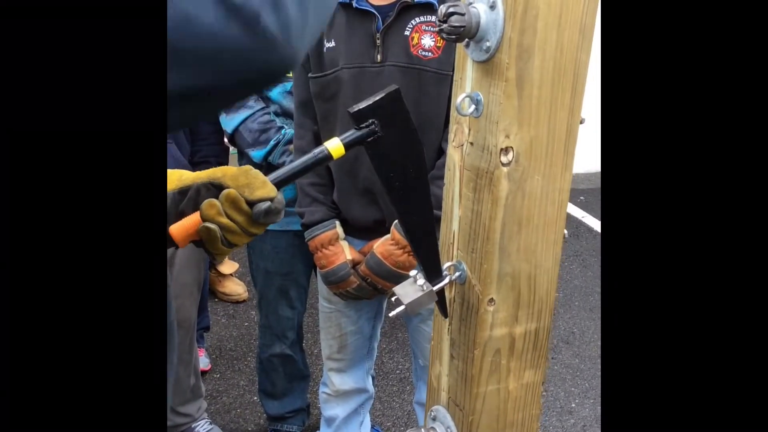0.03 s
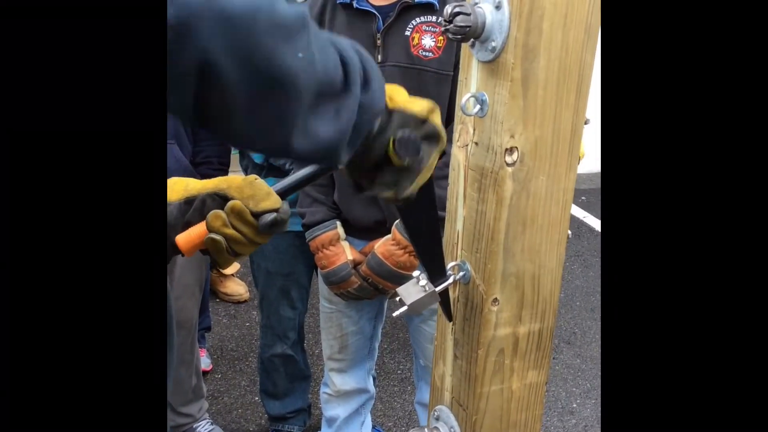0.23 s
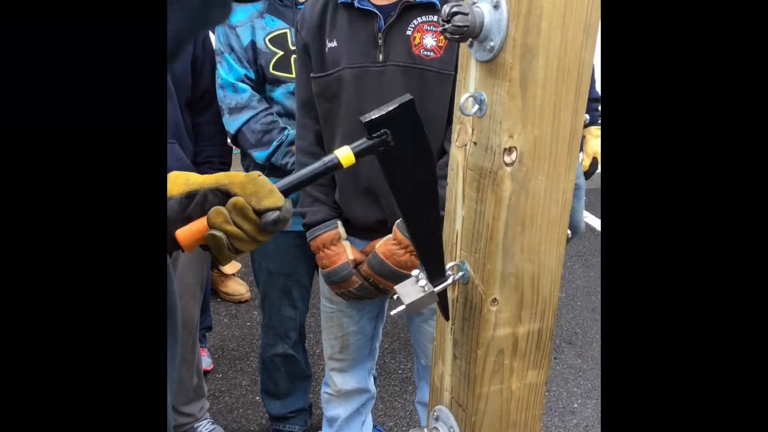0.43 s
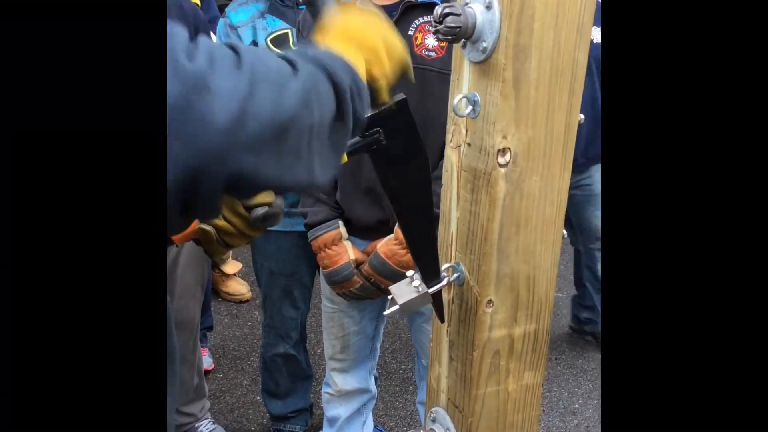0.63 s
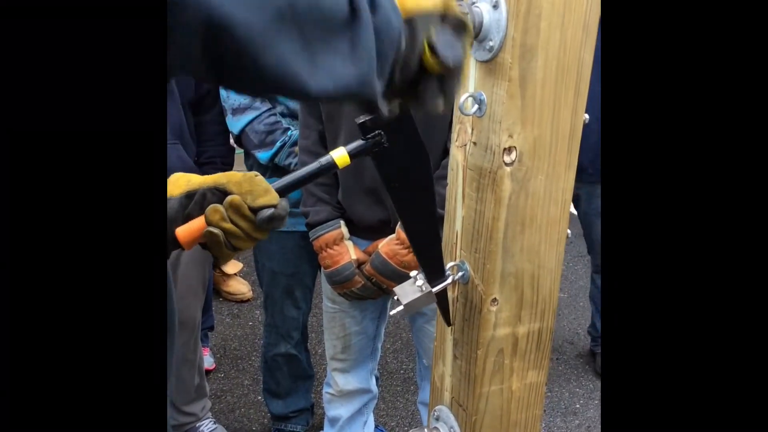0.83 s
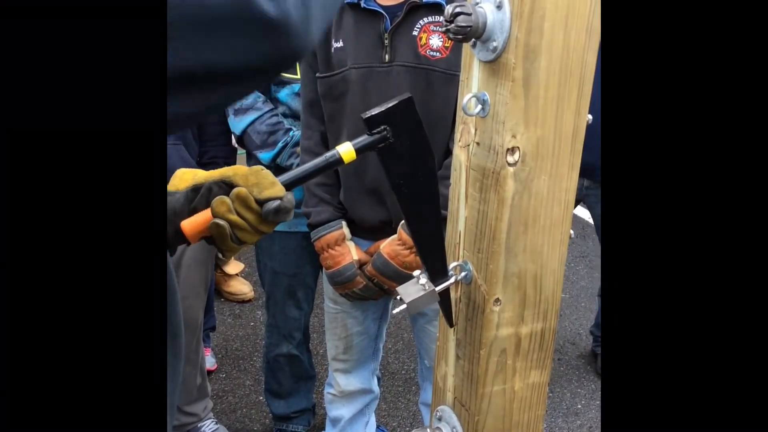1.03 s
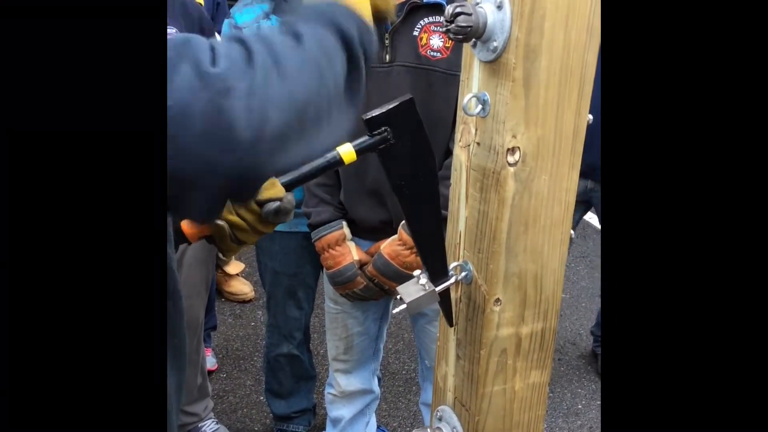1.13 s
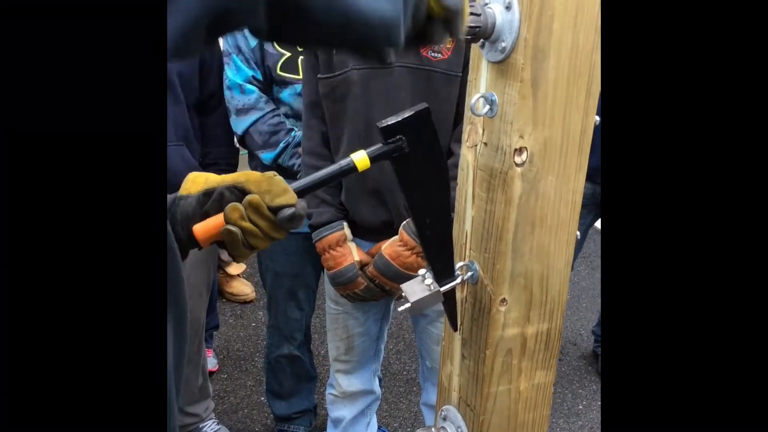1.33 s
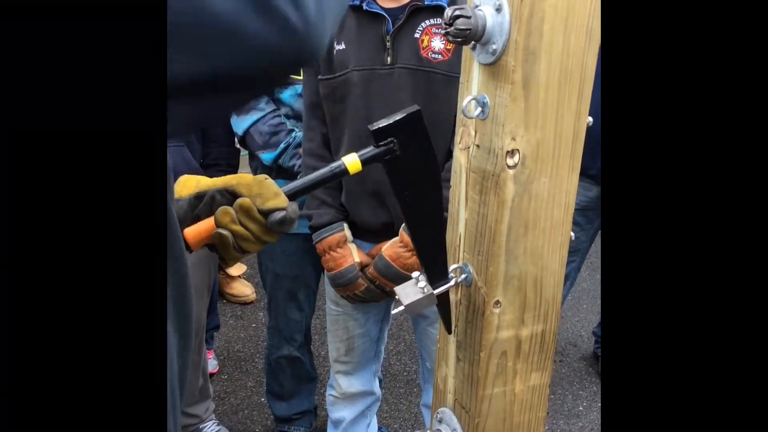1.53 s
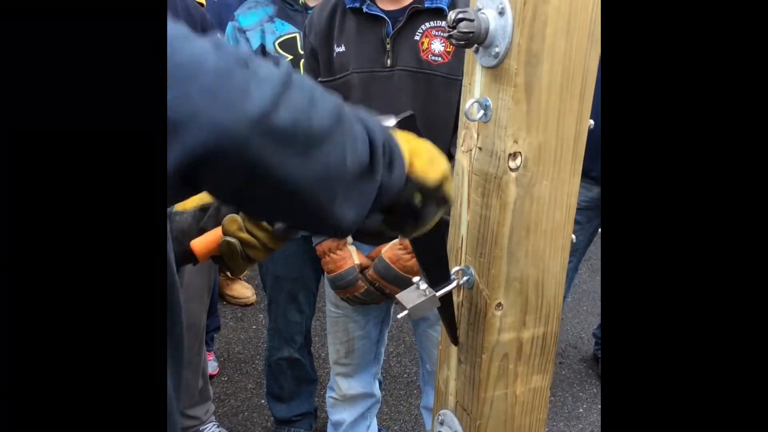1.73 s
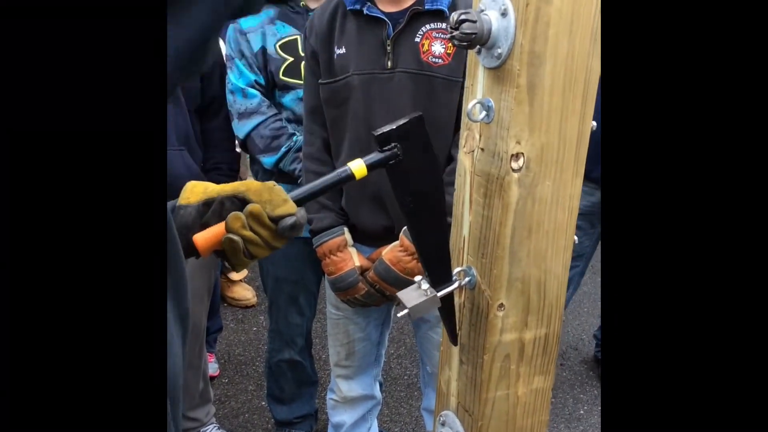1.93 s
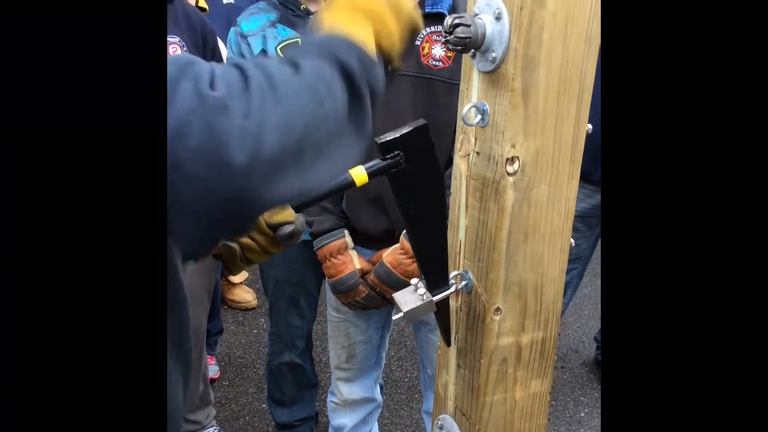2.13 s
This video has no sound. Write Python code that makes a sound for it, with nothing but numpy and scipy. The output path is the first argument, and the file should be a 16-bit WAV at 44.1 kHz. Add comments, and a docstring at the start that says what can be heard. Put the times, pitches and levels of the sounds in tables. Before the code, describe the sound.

A hammer strikes a steel tool four times outdoors, ringing sharply and rattling a padlock.

```python
"""In an outdoor hush, with a soft rustle and the tick of a loose padlock, a hammer swings at a steel
entry tool whose blade is wedged at the lock on a timber post. Four blows land, half a second apart.
A brief swell of hiss and ringing tones is heard just before each. The blow cracks, thumps the post,
rings the steel and shakes the lock; post and fitting knock back, and the yard echoes faintly.
The recorder turns itself down after each blow, then lets the hush return."""
import sys
import numpy as np
from scipy import signal
from scipy.fft import rfft, irfft
from scipy.io import wavfile
from scipy.ndimage import uniform_filter1d, minimum_filter1d

SR = 44100
rng = np.random.default_rng(int(sys.argv[2]) if len(sys.argv) > 2 else 0)


def waveform_to_disk(signal):
    """Save audio, clipped to [-1, 1], as 16-bit WAV at the path in sys.argv[1]."""
    frames = np.transpose(np.atleast_2d(signal))
    scaled = np.clip(frames, -1, 1) * 32767
    samples = np.round(scaled).astype(np.int16)
    wavfile.write(sys.argv[1], SR, samples)


N = 97020

# The hammer blows. Each row: time in seconds, extra dB for the crack, clatter, ring and thump,
# spot struck on the tool from 0 to 1, treble tilt in dB per octave.
BLOWS = [(.2178, 3, 0, 0, 3, 0.16, 0.5), (0.7375, 2, 1.5, 2, 10, 0.38, 1),
         (1.2555, -1.5, 0, -1, 2.5, 0.85, -0.73), (1.7384, 0, 0, 1, 5.5, 1, -0.17)]


def amp(db):
    """Turns decibels into a number to multiply a sound by."""
    return 10 ** (np.asarray(db) / 20)


def evened(x):
    """Scales a sound to an average (rms) level of 1."""
    return x / np.sqrt(np.mean(x ** 2) + 1e-20)


def read(points, hz):
    """Reads between the rows of a table, with frequencies spaced by octaves."""
    row_hz, value = np.transpose(points)
    return np.interp(np.log(hz + 1), np.log(row_hz + 1), value)


def add(mix, start_s, sound):
    """Mixes a sound in at its start time."""
    part = mix[max(round(start_s * SR), 0):][:len(sound)]
    part += sound[:len(part)]


def coloured(x, spectrum, tilt_db=0):
    """Sets how strong a sound's low and high parts are, then evens its level."""
    hz = np.fft.rfftfreq(len(x), 1 / SR)
    gain = amp(read(spectrum, hz) + tilt_db * np.log2(hz + 20))
    return evened(irfft(rfft(x) * gain, len(x)))


def wobble(length, span_s):
    """A random curve that drifts to a new value every span_s seconds."""
    t = np.arange(length) / SR
    return np.interp(t / span_s, np.arange(length), rng.standard_normal(length))


def fade(t, fade_s):
    """Dies away by 60 dB in fade_s seconds, the fade time."""
    return np.exp(-np.log(1000) * t / fade_s)


def dying(x, fade_times):
    """Lets each frequency die away at its own speed."""
    hz, t, bands = signal.stft(x, SR, nperseg=256)
    gain = amp(-60 * t / read(fade_times, hz)[:, None])
    return signal.istft(bands * gain, SR)[1][:len(x)]


def hush():
    """The outdoor background: low, soft noise that swells slightly."""
    # The tone of the hush. Each row: frequency in Hz, relative level in dB.
    spectrum = [(25, -14), (65, 6.5), (130, 5), (250, 3), (420, 5), (800, -0.5), (1400, -3.5), (2800, -8.5),
                (4000, -9), (6500, -19), (10000, -21), (15000, -34)]
    level_db = -57.5 + 1.1 * wobble(N, span_s=0.04)
    return amp(level_db) * coloured(rng.standard_normal(N), spectrum)


def rustles():
    """Soft rustles, probably a sleeve as the arm draws back."""
    # The rustles. Each row: start in seconds, length in seconds, level in dB.
    moves = [(.07, 0.086, -56), (0.523, 0.087, -57.5), (1.012, 0.11, -52), (2.037, 0.09, -55)]
    # Their tone. Each row: frequency in Hz, relative level in dB.
    spectrum = [(25, -6), (70, 8.5), (160, 5), (260, 10.5), (450, 2), (800, 3.5), (1400, 0), (2800, -7),
                (4000, -6), (6500, -12), (10000, -17), (15000, -32)]
    out, t = np.zeros(N), np.arange(SR // 4) / SR
    for start_s, length_s, db in moves:
        arch = np.sqrt(abs(np.sin(np.pi * np.minimum(t / length_s, 1))))
        add(out, start_s, amp(db) * arch * coloured(rng.standard_normal(len(t)), spectrum))
    return out


def ticks():
    """The loose lock shifts and ticks faintly while the hammer is away."""
    # The ticks. Each row: start in seconds, level in dB.
    shifts = [(0.093, -50.5), (1.165, -51), (1.628, -42.5)]
    # Their tone. Each row: frequency in Hz, relative level in dB.
    spectrum = [(200, 2.5), (1300, 6.5), (2500, -2.5), (4000, -3), (8000, -19), (15000, -26.5)]
    out, t = np.zeros(N), np.arange(SR // 4) / SR
    for start_s, db in shifts:
        noise = coloured(rng.standard_normal(len(t)), spectrum)
        add(out, start_s, amp(db) * noise * fade(t, fade_s=0.042))
    return out


def knocks():
    """The shaken post and fitting knock with short, hollow timber tones that have no deep bass."""
    # The knocks. Each row: start in seconds, level in dB, pitch in Hz, fade time in seconds.
    hits = [(.095, -48.5, 443, 0.1), (.296, -16, 488, 0.043), (.3025, -12, 558, 0.046),
            (0.3096, -16, 459, 0.046), (.332, -25, 422.6, 0.087), (.348, -26.5, 479, 0.09),
            (0.797, -19.5, 444, 0.078), (.8185, -12, 428.6, 0.077), (.828, -13.5, 396, 0.1),
            (.870, -27.5, 524, .06), (0.885, -27.5, 419, 0.11), (.903, -32.5, 495, 0.038),
            (.953, -35.5, 361, .1), (1.166, -42, 261.5, 0.054), (1.275, -17.5, 552, 0.036),
            (1.325, -18.5, 411, 0.032), (1.384, -29.5, 560, .09), (1.402, -32.5, 397, 0.071),
            (1.435, -34.5, 402, 0.048), (1.766, -11.5, 477, .06), (1.811, -17.5, 543, 0.044),
            (1.827, -11.5, 417, 0.037), (1.834, -13.5, 563.7, 0.086), (1.869, -15, 407.4, 0.053),
            (1.893, -32.5, 444, 0.15)]
    # The timber's tones. Each row: multiple of the knock's pitch, relative level in dB.
    timber = [(0.378, -19), (.78, -7.5), (0.998, -0.5), (1.301, -8), (1.618, -12), (2.049, -15.5),
              (2.7, -29.5)]
    # The gritty noise in a knock. Each row: frequency in Hz, relative level in dB.
    grit_spectrum = [(30, -41.5), (80, -7), (160, -2), (280, -16.5), (500, -3), (900, -0.5), (1500, -17),
                     (4000, -37.5), (9000, -28.5), (15000, -62.5)]
    rise_s, bass_cut_hz = 0.0016, 137.2
    out, t = np.zeros(N), np.arange(SR // 4) / SR
    for start_s, db, hz, fade_s in hits:
        wood = sum(amp(tone_db) * np.sin(2 * np.pi * (hz * ratio * t + rng.random()))
                   for ratio, tone_db in timber)
        grit = amp(-10.5) * coloured(rng.standard_normal(len(t)), grit_spectrum)
        add(out, start_s, amp(db) * (wood + grit) * fade(t, fade_s) * np.minimum(t / rise_s, 1))
    return signal.sosfilt(signal.butter(4, bass_cut_hz, "high", fs=SR, output="sos"), out)


def yard_echo(x):
    """The surroundings send back a thin, blurred echo."""
    # How the echo dies. Each row: frequency in Hz, fade time in seconds.
    fade_times = [(200, 0.45), (2000, 0.99), (5000, 0.88), (9000, 0.68), (15000, 0.71)]
    tail = dying(rng.standard_normal(SR), fade_times)
    return amp(-27.5) * signal.fftconvolve(x, tail / np.linalg.norm(tail))[:N]


def lead_in_swells():
    """A brief swell of hiss and ringing tones is heard just before each crack."""
    # The tone of the hiss. Each row: frequency in Hz, relative level in dB.
    hiss_spectrum = [(50, 8), (150, -0.5), (500, 2), (1200, -11.5), (2500, -2.5), (4500, -3.5), (6500, -10),
                     (8200, -13), (9500, -25), (15000, -30.5)]
    # The balance of the ringing tones. Each row: frequency in Hz, relative level in dB.
    ring_spectrum = [(2000, -8), (3800, -5), (4600, 2.5), (7000, -11.5), (8100, -0.5), (9000, -24)]
    peak_s, lead_s = 0.016, 0.0235
    out, t = np.zeros(N), np.arange(SR // 20) / SR
    swell = amp(np.interp(t, [0, peak_s, lead_s], [-19, 0, -5])) * (t < lead_s)
    for time_s, *_, spot, tilt_db in BLOWS:
        hiss = amp(-27) * coloured(rng.standard_normal(len(t)), hiss_spectrum, tilt_db)
        ring = amp(-22) * coloured(steel(t, spot, fading=False), ring_spectrum)
        add(out, time_s - lead_s, swell * hiss + swell ** 2.4 * ring)  # the ring swells more steeply
    return out


def steel(t, spot, fading=True):
    """The tool rings with many wavering tones; the spot struck sets how strong each is."""
    # The tool's tones. Each entry: frequency in Hz.
    pitches = [1310, 2013, 3762, 3877, 4133, 4368, 4600, 5640, 5925, 7041, 7736, 7930, 8082, 8600, 13500,
               14880]
    # The same tones. Each row: dB when struck at spot 0, dB at spot 1, fade time in seconds.
    tones = [(-51.5, -43.5, 0.39), (-17, -28.5, 0.21), (-13.5, -35.5, 0.12), (-18, -35, 0.26),
             (-15, -36, 0.065), (-13.5, -30.5, 0.057), (-8, -29, 0.021), (-20, -21, 0.051),
             (-31, -28, 0.35), (-30.5, -30, 0.12), (-24, -18.5, 0.19), (-24, -13.5, .25),
             (-33, -8.5, 0.053), (-39.5, -23, .2), (-28.5, -35, .09), (-32, -36.5, .11)]
    waver_s = 0.006
    out = np.zeros(len(t))
    for hz, (spot0_db, spot1_db, fade_s) in zip(pitches, tones):
        waver = 1 + wobble(len(t), waver_s) + 1j * wobble(len(t), waver_s)  # in level and phase
        tone = (waver * np.exp(2j * np.pi * (hz * t + rng.random()))).real
        level = amp(spot0_db + (spot1_db - spot0_db) * spot)
        out += level * tone * (fade(t, fade_s) if fading else 1)
    return out


def thump(t, rise_s):
    """The post takes the blow with one low, short tone."""
    hz = 65
    return np.sin(2 * np.pi * hz * t) * fade(t, fade_s=0.064) * np.minimum(t / rise_s, 1)


def crack(t, tilt_db):
    """Steel meets steel in a very short, bright burst of noise."""
    # The crack's tone. Each row: frequency in Hz, relative level in dB.
    spectrum = [(100, -13.5), (400, 2), (1000, -10.5), (2000, 0), (3000, -3.5), (4100, 7.5), (5500, -2.5),
                (8000, -6.5), (11000, -9.5), (15000, -18)]
    return coloured(rng.standard_normal(len(t)), spectrum, tilt_db) * fade(t, fade_s=0.026)


def clatter(t, common_noise, tilt_db):
    """Lock, bolt and tool chatter together, partly the same way at every blow."""
    # The clatter's tone. Each row: frequency in Hz, relative level in dB.
    spectrum = [(30, -46.5), (90, -23), (150, -0.5), (205, 1), (270, -7.5), (430, 6.5), (700, 1),
                (1050, -3.5), (1400, 1.5), (1900, -4.5), (2700, -7), (4000, -2), (5200, -6), (7500, -2),
                (8300, -0.5), (9500, -8.5), (11400, -5), (12400, -17), (13600, -14.5), (15000, -15.5)]
    # How it dies. Each row: frequency in Hz, fade time in seconds.
    fade_times = [(200, 0.33), (600, 0.26), (2000, 0.24), (5000, .24), (9000, 0.19), (15000, 0.13)]
    share, rise_s = 0.84, 0.0036
    shaking = share * common_noise + np.sqrt(1 - share ** 2) * rng.standard_normal(len(t))
    metal = small_parts(coloured(shaking, spectrum, tilt_db))
    chatter = amp(wobble(len(t), span_s=0.003))
    return dying(metal, fade_times) * chatter * np.minimum(t / rise_s, 1)


def small_parts(x):
    """Many small metal parts crowd a sound's spectrum with narrow peaks and dips."""
    depth_db, spacing_hz, full_depth_hz = 3.2, 90, 1000
    hz = np.fft.rfftfreq(len(x), 1 / SR)
    ripple = np.interp(hz / spacing_hz, np.arange(len(hz)), rng.standard_normal(len(hz)))
    gain = amp(depth_db * ripple * np.minimum(hz / full_depth_hz, 1))
    return evened(irfft(rfft(x) * gain, len(x)))


def blows():
    """Each blow cracks, shakes the lock and rings the tool; the post's thump starts just ahead."""
    ring_rise_s, thump_lead_s = 0.002, 0.0099
    out, t = np.zeros(N), np.arange(SR // 2) / SR
    common_noise = rng.standard_normal(len(t))
    for time_s, crack_db, clatter_db, ring_db, thump_db, spot, tilt_db in BLOWS:
        add(out, time_s, amp(crack_db - 2) * crack(t, tilt_db))
        add(out, time_s, amp(clatter_db - 11) * clatter(t, common_noise, tilt_db))
        add(out, time_s, amp(ring_db) * steel(t, spot) * np.minimum(t / ring_rise_s, 1))
        add(out, time_s - thump_lead_s, amp(thump_db - 25.5) * thump(t, rise_s=thump_lead_s))
    return out


def scene():
    """All the sounds, mixed into one channel."""
    near = blows() + lead_in_swells() + knocks() + ticks()
    return (near + yard_echo(near) + rustles() + hush())[None]


def record(dry):
    """The recorder turns down for a moment after loud sounds, rounds peaks and cuts the top treble."""
    threshold_db, max_drop_db, hold_s, recover_s = -19.5, 5.5, 0.28, 0.0142
    top_hz = 15380
    power_db = 10 * np.log10(abs(uniform_filter1d(dry[0] ** 2, size=200)) + 1e-12)
    drop_db = np.clip(power_db - threshold_db, 0, max_drop_db)
    half_hold = int(hold_s * SR) // 2
    # Keep the biggest drop of the last hold_s seconds.
    held_db = -minimum_filter1d(-drop_db, 2 * half_hold + 1, origin=half_hold, mode="constant")
    ease = np.exp(-1 / (recover_s * SR))
    eased_db = signal.lfilter([1 - ease], [1, -ease], held_db)
    turned_down = dry * amp(-np.maximum(held_db, eased_db))  # down at once, back up smoothly
    treble_cut = signal.firwin(301, top_hz, window=("kaiser", 9), fs=SR)
    return signal.oaconvolve(np.tanh(turned_down), treble_cut[None], "same")


dry = scene()
out = record(dry)
waveform_to_disk(out)
```